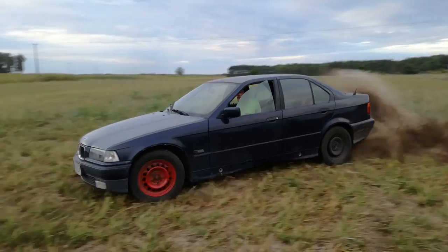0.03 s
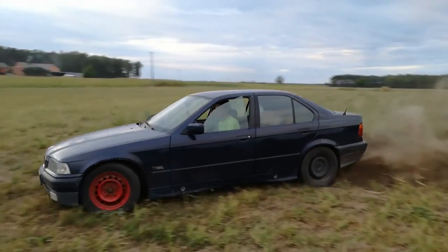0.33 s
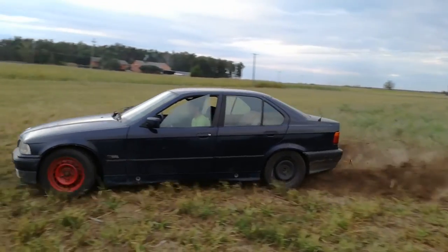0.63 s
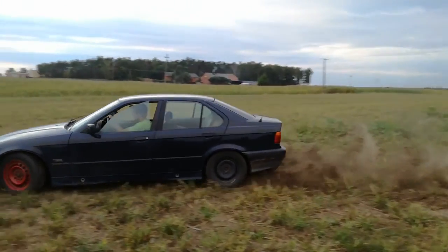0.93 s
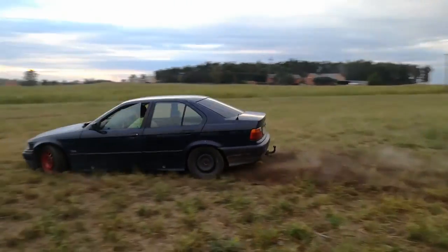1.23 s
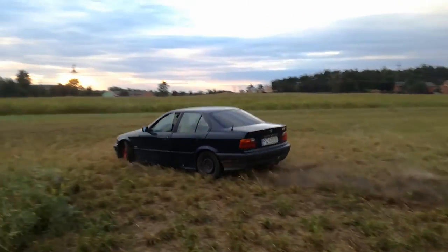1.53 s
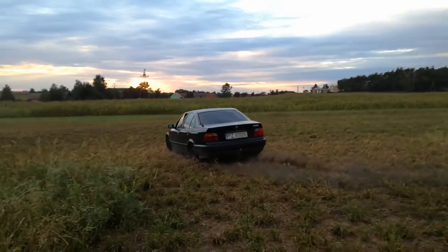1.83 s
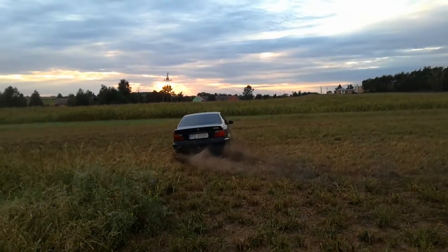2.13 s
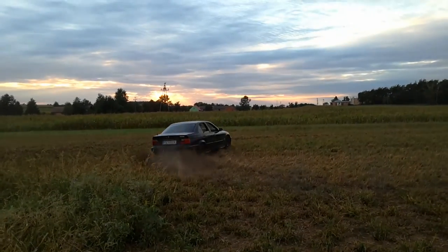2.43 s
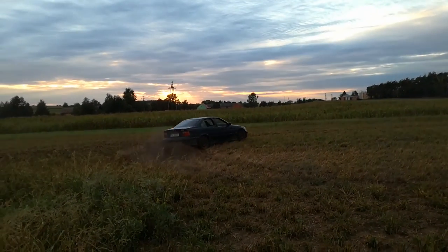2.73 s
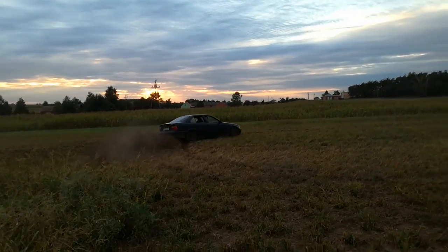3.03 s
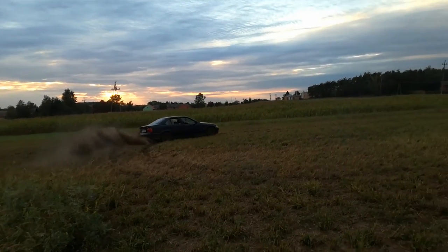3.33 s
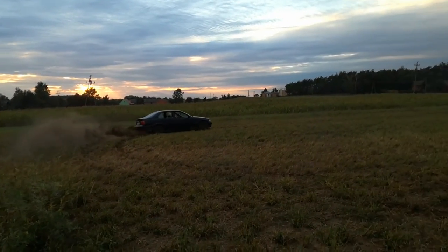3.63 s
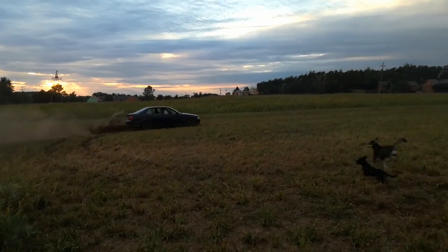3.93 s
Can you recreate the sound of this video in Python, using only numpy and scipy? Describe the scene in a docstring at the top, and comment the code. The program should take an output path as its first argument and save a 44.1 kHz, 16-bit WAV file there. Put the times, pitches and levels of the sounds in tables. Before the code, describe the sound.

A car engine runs at high revs close by, its wheels churning gritty soil, with a faint fan whine and short belt chirps in the first half second. The low exhaust boom swells as the car slides past, loudest from about 1 to 2 seconds. Clods knock dully against it between 1.9 and 2.7 seconds. The sound then dulls and fades, the revs sagging after 3 seconds.

```python
"""A six-cylinder car's exhaust booms as it slides past on a dry field at high revs and drives off.
The cylinders fire so fast that their puffs blend into a low note, loudest as the tail swings
towards the listener. The spinning wheels churn gritty soil and throw clods; brief hisses come and go.
In the engine bay a fan whines and a belt chirps; with distance everything fades and dulls."""
import sys
import numpy as np
from scipy import signal
from scipy.fft import rfft, irfft
from scipy.io import wavfile

SR = 44100
rng = np.random.default_rng(int(sys.argv[2]) if len(sys.argv) > 2 else 0)


def log_audio(samples):
    """Write samples as a 16-bit WAV file to the path given in sys.argv[1]."""
    # one column per channel
    frames = np.atleast_2d(samples).T
    # limit to full scale, then quantise
    limited = np.clip(frames, -1, 1)
    pcm = np.round(limited * 32767).astype(np.int16)
    wavfile.write(sys.argv[1], SR, pcm)


N = 176400
T = np.arange(N) / SR

# How alike noise is in the two ears: pitch_hz, likeness (1 = the same)
LIKENESS = [(100, 1), (200, 1), (300, 0.92), (600, .72), (1100, 0.98), (1800, 0.55), (2600, 0.4),
            (3500, 0.29), (5000, .25), (8000, .1), (15000, .05)]


def exhaust(firings):
    """Each firing pushes out a puff of gas: the puffs make a boom, the swirling gas a rumble."""
    # The boom at the firing rate: time_s, level_db
    boom_levels = [(0.0, -28.5), (0.22, -30.5), (0.28, -23.5), (0.42, -22), (0.49, -26), (0.62, -21),
                   (0.85, -18), (1.0, -13.5), (1.06, -14.5), (1.2, -12.5), (1.72, -11), (2.08, -12),
                   (2.35, -16.5), (2.68, -17.0), (2.9, -21), (3.2, -22.5), (3.45, -26.0), (3.85, -27.5),
                   (4.0, -32)]
    # Tones at two and three times that rate: time_s, second_db, third_db
    overtone_levels = [(0, -35, -46), (.18, -45, -34), (.3, -34, -50), (.65, -35.5, -43),
                       (.9, -44.5, -51.5), (1.18, -32.5, -47.5), (1.42, -46.5, -40.5), (1.75, -35, -49),
                       (2.15, -38.5, -60), (2.6, -37.5, -49), (2.9, -47, -53.5), (3.3, -45.5, -56.5),
                       (4, -62, -68)]
    # Tones from unequal cylinders: times_per_engine_cycle, relative_db
    uneven_tones = [(2, -18), (3, -7), (4, -0.5), (5, -7), (7, 1), (8, -2), (9, -8), (10, -19), (11, -8.5),
                    (13, -21), (14, -15.5), (15, -21.5), (21, -21), (24, -19)]
    # Rise and fall of those tones and the rumble: time_s, relative_db
    rumble_levels = [(0, -35), (.3, -34), (.8, -35), (1.5, -32.5), (2.1, -33.5), (2.7, -35.5), (3.3, -39.5),
                     (4, -46)]
    # The rumble's colour: pitch_hz, relative_db
    rumble_spectrum = [(50, -21.5), (75, -17.5), (105, -0.5), (128, 1), (148, -1), (172, -1.5), (205, -3),
                       (250, -6.5), (310, -11.5), (420, -17), (700, -44.5)]
    # Deep buffeting of the gas: time_s, level_db
    thump_levels = [(0, -39), (.9, -36.5), (1.7, -37), (2.3, -42.5), (3.2, -50.5), (4, -48)]
    # The buffeting's colour: pitch_hz, relative_db
    thump_spectrum = [(20, -8.5), (45, -2.5), (75, 3.5), (110, -2.5), (180, -15)]
    # How much later the left ear hears the exhaust: time_s, lag_ms
    left_lag = [(0, 0.077), (.5, -0.095), (.68, -0.16), (1.05, 0.057), (1.55, 0.044), (2.3, 0.22),
                (2.9, .22), (3.3, 0.26), (4, 0.36)]
    boom_db, = curves(boom_levels)
    rumble_db, = curves(rumble_levels)
    thump_db, = curves(thump_levels)
    lag_ms, = curves(left_lag)
    tones = from_db(boom_db) * flutter(.03, 33) * tone(firings)
    for multiple, db in enumerate(curves(overtone_levels), start=2):
        tones += from_db(db) * flutter(.17, 36) * tone(multiple * firings)
    cycles = firings / 6  # six firings to an engine cycle
    for multiple, db in uneven_tones:
        gain = from_db(rumble_db + db - 4) * flutter(.32, 5)
        tones += gain * tone(multiple * cycles + .08 * drift(2.3))
    rumble = from_db(rumble_db + 2.5) * coloured_noise(rumble_spectrum)
    thump = from_db(thump_db) * coloured_noise(thump_spectrum)
    left, right = tones + rumble + thump
    return np.array([delayed(left, lag_ms / 1000), right])


def churning_soil(firings):
    """Tyres tear up soil and the engine rushes: a gritty noise that throbs with the firings."""
    # Loudness of four pitch zones: time_s, low_db, middle_db, treble_db, top_db
    zone_levels = [(0, -33, -31.5, -39.5, -57), (.25, -34, -31, -40, -55.5), (.6, -35, -35, -43, -57.5),
                   (1.0, -37, -35, -43, -57.5), (1.25, -40, -36.5, -46, -57.5),
                   (1.45, -38.5, -35, -44, -56), (1.9, -41, -40, -45, -60.5), (2.1, -44, -41, -46.5, -60.5),
                   (2.68, -44, -45, -52, -65.5), (2.85, -49.5, -44.5, -51.5, -67),
                   (3.3, -61, -49.5, -58, -69.5), (3.6, -59.5, -56.5, -63, -73.5),
                   (4, -65.5, -57, -63.5, -76)]
    # Colour within the zones as the car moves: pitch_hz, beside_db, turning_db, far_db
    colour = [(350, -5, -9, -5), (470, -4, -3.5, -3.5), (560, -9, -4.5, -2), (700, -3, -3.5, 1.5),
              (875, -10, -6.5, -14), (1040, -2.5, -4, -7.5), (1480, -11, -7, -6), (1890, -10, -9.5, -6.5),
              (2170, -16.5, -14, -11), (2720, -18.5, -24.5, -21), (3200, -19.5, -15.5, -18.5),
              (4000, -24.5, -14, -22.5), (4860, -24, -25, -21), (6120, -33, -31, -30.5),
              (7500, -41, -40.5, -39), (9300, -42, -42.5, -44), (11200, -43.5, -46.5, -46),
              (13400, -44.5, -42.5, -41), (15500, -36, -38, -43)]
    # How much louder the left is than the right: pitch_hz, near_db, far_db
    balance = [(300, 2.5, 0), (520, -11.5, 0.5), (800, 2.5, -0.5), (1010, -4, -1), (1400, 8, 4.5),
               (1950, 4, 8.5), (2330, -5.5, -6), (2980, -12, -17.5), (3700, -6.5, -5.5),
               (4300, -4.5, -12.5), (5300, -3, 1.5), (7200, -9, -13.5), (9000, 3, 3), (11000, -2, -5),
               (13500, -0.5, 8), (15070, 8, 6)]
    stage_times_s = [.74, 2, 4.3]  # beside, turning, far
    turn_start_s, turn_end_s, left_lag_s = .6, 1.2, .0001
    zone_db = np.array(curves(zone_levels)) + [[-.38], [-.64], [-.82], [-.75]]
    away = np.clip((T - turn_start_s) / (turn_end_s - turn_start_s), 0, 1)
    stage_fades = np.array([np.interp(T, stage_times_s, row) for row in np.eye(3)])
    edges_hz = np.geomspace(352, 16500, 23)
    centres_hz = np.sqrt(edges_hz[1:] * edges_hz[:-1])
    zones = np.searchsorted([900, 2400, 7400], centres_hz)
    stage_gains = from_db([at_pitch(colour, centres_hz, column) for column in (1, 2, 3)])
    powers = stage_gains ** 2 * np.diff(edges_hz)
    throb = 1 + .18 * np.sin(2 * np.pi * firings)
    streams = [grit() * throb, grit() * throb]
    shared_drift = drift(21)
    out = np.zeros((2, N))
    for band, (hz, zone) in enumerate(zip(centres_hz, zones)):
        alike = np.clip(at_pitch(LIKENESS, hz), 0, .95)
        noise = filtered(streams[band % 2], 3, edges_hz[band:band + 2], "band")
        pair = unit_power(stereo(noise, alike))
        balance_db = (1 - away) * at_pitch(balance, hz) + away * at_pitch(balance, hz, column=2)
        lean = from_db(balance_db / 2)
        # Power of the two sides averaged, allowing for the lean and the lag.
        centre_power = (lean ** 2 + lean ** -2 + 2 * alike * np.cos(2 * np.pi * hz * left_lag_s)) / 4
        share_of_zone = (powers[:, band] / powers[:, zones == zone].sum(axis=1)) @ stage_fades
        flicker_db = 1.25 * (.44 * shared_drift + drift(20))
        gain = from_db(zone_db[zone] + flicker_db) * np.sqrt(share_of_zone / centre_power)
        out += gain * np.array([lean, 1 / lean]) * pair
    left, right = add_echo(out)
    return np.array([delayed(left, round(left_lag_s * SR) / SR, before=0), right])


def grit():
    """Two streams of tiny impacts of uneven size in a smooth rush."""
    grains_per_s, grain_share = 1500, .23
    sizes = from_db(4.5 * np.minimum(rng.exponential(1, (2, N)), 5))
    signs = rng.choice([-1, 1], (2, N))
    hits = rng.random((2, N)) < grains_per_s / SR
    rush = rng.standard_normal((2, N))
    return np.sqrt(grain_share) * unit_power(sizes * signs * hits) + np.sqrt(1 - grain_share) * rush


def add_echo(pair):
    """A nearby reflection adds a slightly swaying echo of the treble, which hollows the hiss."""
    # Strength of the echo: time_s, gain
    echo_gain = [(0, 0.13), (1.2, 0.13), (2, 0.15), (4, 0.36)]
    echo_s, sway_s = .00189, .00001
    gain, = curves(echo_gain)
    treble = filtered(pair, 1, 1520, "high")
    echo = np.array([delayed(side, echo_s + sway_s * drift(.93), before=0) for side in treble])
    return pair + gain * echo


def clods():
    """Lumps of soil hit the underside of the car with a dull knock, then crumble."""
    # The hits: start_s, relative_db
    hits = [(1.876, -25.5), (1.971, -28.5), (2.042, -22), (2.054, -19.5), (2.081, -16.5), (2.127, -22),
            (2.154, -24), (2.165, -23.5), (2.206, -26.5), (2.305, -20.5), (2.376, -26), (2.684, -26.5),
            (2.721, -28)]
    crumble_db, knock_db, decay_s = .5, 23.5, .013
    crumble = np.zeros(N)
    for start_s, db in hits:
        fade = np.exp(-np.clip((T - start_s) / decay_s, 0, 50))
        crumble += from_db(db + crumble_db) * (T >= start_s) * fade
    blows = crumble * (rng.standard_normal(N) + .5 * rng.standard_normal((2, N)))
    for start_s, db in hits:
        blows[:, int(start_s * SR)] += from_db(db + knock_db)
    return filtered(blows + 1e-18, 2, [500, 1180], "band")


def cooling_fan(firing_hz):
    """The blades whine. The fan is driven through a fluid, so its pitch follows the revs late."""
    # The whine: time_s, level_db
    whine_levels = [(0, -32), (.4, -38), (.7, -40.5), (1.1, -42), (1.5, -45.5), (1.9, -53), (2.25, -46),
                    (2.55, -52.5), (3.0, -46), (3.3, -50), (3.6, -56.5), (4, -61.5)]
    slip_s, blades_per_firing = .17, 3.065
    whine_db, = curves(whine_levels)
    hold = np.exp(-1 / (slip_s * SR))
    trailing_hz = firing_hz[0] + signal.lfilter([1 - hold], [1, -hold], firing_hz - firing_hz[0])
    return from_db(whine_db) * flutter(.11, 23) * tone(blades_per_firing * np.cumsum(trailing_hz) / SR)


def belt_chirps():
    """The engine's belt gives short, wavering chirps."""
    # The chirps: peak_s, width_s, pitch_hz, level_db
    chirps = [(0.083, 0.024, 992, -27.5), (0.24, 0.052, 1897, -32), (0.322, 0.061, 1130, -38.5),
              (0.504, 0.018, 1095, -32)]
    waver_hz = 14
    out = np.zeros(N)
    for peak_s, width_s, hz, db in chirps:
        gain = from_db(db) * swell(peak_s, width_s) * flutter(.35, 50)
        out += gain * tone(np.cumsum(hz + waver_hz * drift(52)) / SR)
    return out


def hiss_bursts():
    """Short, bright bursts of hiss, and one faint high tick near one second."""
    # The bursts and the tick: peak_s, width_s, level_db
    bursts = [(0.791, .04, -47), (0.993, .004, -45), (2.343, .025, -51.5), (3.85, 0.024, -59.5)]
    # Their colour: pitch_hz, relative_db
    spectrum = [(1500, -15), (4500, 6), (7000, -6.5), (11000, -12), (15000, -7)]
    gain = sum(from_db(db) * swell(peak_s, width_s) for peak_s, width_s, db in bursts)
    return gain * from_db(2 * drift(150)) * coloured_noise(spectrum)


def from_db(db):
    """Turn decibels into a gain to multiply by."""
    return 10 ** (np.asarray(db) / 20)


def unit_power(x):
    """Scale a signal to an average power of 1."""
    return x / np.sqrt(np.mean(x ** 2) + 1e-20)


def curves(rows):
    """Join a table's points over time, one curve for each column after the first."""
    times_s, *columns = np.transpose(rows)
    return [np.interp(T, times_s, column) for column in columns]


def at_pitch(rows, hz, column=1):
    """Read a table's column at the given pitch."""
    table = np.array(rows)
    return np.interp(np.log(hz), np.log(table[:, 0]), table[:, column])


def drift(rate_hz):
    """A smooth random wander, about 1 in size; a higher rate wanders faster."""
    step, warm_up = 40, 2000
    hold = np.exp(-2 * np.pi * step * rate_hz / SR)
    noise = rng.standard_normal(N // step + warm_up + 2)
    slow = signal.lfilter([1], [1, -2 * hold, hold * hold], noise)[warm_up:]
    return np.interp(np.arange(N) / step, np.arange(len(slow)), unit_power(slow))


def flutter(depth, rate_hz):
    """A gain that wobbles at random around 1."""
    return 1 + depth * drift(rate_hz)


def tone(turns):
    """A sine wave of power 1 that follows a running count of turns from a random start."""
    return np.sqrt(2) * np.sin(2 * np.pi * (turns + rng.random()))


def swell(peak_s, width_s):
    """A bell-shaped rise and fall."""
    return np.exp(-.5 * np.minimum(((T - peak_s) / width_s) ** 2, 100))


def stereo(noises, alike):
    """Mix two noises into left and right: one is shared, the other has opposite signs."""
    mid, side = noises
    return np.sqrt(1 + alike) * mid + np.sqrt(1 - alike) * side * [[1], [-1]]


def coloured_noise(spectrum):
    """Stereo noise with the given colour, alike on both sides in the bass."""
    hz = np.maximum(np.arange(N // 2 + 1) * SR / N, 1)
    noises = rfft(rng.standard_normal((2, N))) * from_db(at_pitch(spectrum, hz))
    low_cut = 1 / (1 + (spectrum[0][0] / 2 / hz) ** 4)
    high_cut = 1 / (1 + (hz / 2 / spectrum[-1][0]) ** 4)
    return unit_power(irfft(low_cut * high_cut * stereo(noises, at_pitch(LIKENESS, hz)), N))


def filtered(x, order, hz, kind):
    """Keep one range of pitches; a higher order gives steeper edges."""
    return signal.sosfilt(signal.butter(order, hz, kind, fs=SR, output="sos"), x)


def delayed(x, lag_s, before=None):
    """Make a signal arrive later; `before` fills the gap at the start."""
    return np.interp(T - lag_s, T, x, left=before)


def scene():
    """The revs drive the exhaust, fan and churning; chirps, clods and hisses come at set times."""
    # How often the cylinders fire: time_s, rate_hz
    firing_rates = [(0.0, 159.8), (0.3, 163.8), (0.52, 151.4), (0.72, 146.4), (0.98, 144.2), (1.22, 140.7),
                    (1.4, 149.6), (1.55, 146.4), (1.76, 145.5), (1.9, 152.8), (2.04, 153.7), (2.52, 146.6),
                    (2.75, 141.6), (2.98, 146.4), (3.2, 142.9), (3.58, 128.2), (3.82, 119.5), (4.0, 124.5)]
    firing_hz, = curves(firing_rates)
    firings = np.cumsum(firing_hz * flutter(.0015, 10)) / SR  # running count
    boom = exhaust(firings)
    bay = cooling_fan(firing_hz) + belt_chirps()
    bay_pair = np.array([delayed(bay, lag_s=.00018), bay])
    return boom + bay_pair + churning_soil(firings) + clods() + hiss_bursts()


def record(dry):
    """Start softly and cut off the highest treble steeply."""
    fade_in_s, cutoff_hz = .004, 15800
    fade_in = np.minimum(T / fade_in_s, 1)
    return signal.sosfilt(signal.ellip(12, .1, 80, cutoff_hz, fs=SR, output="sos"), dry * fade_in)


dry = scene()
out = record(dry)
log_audio(out)
```